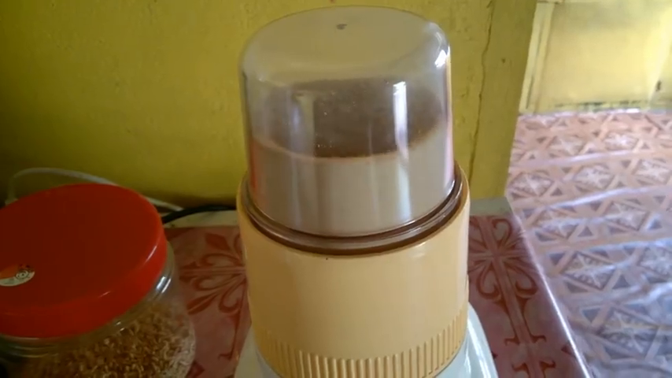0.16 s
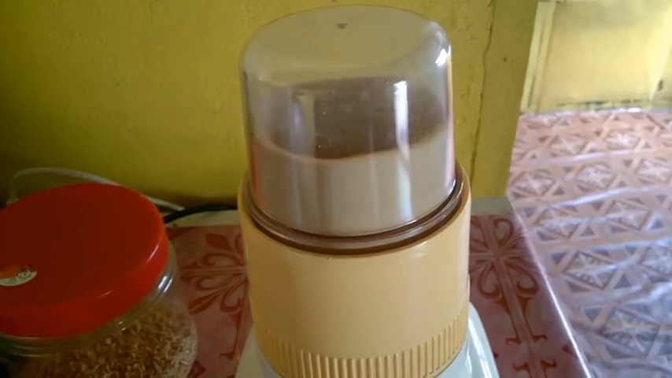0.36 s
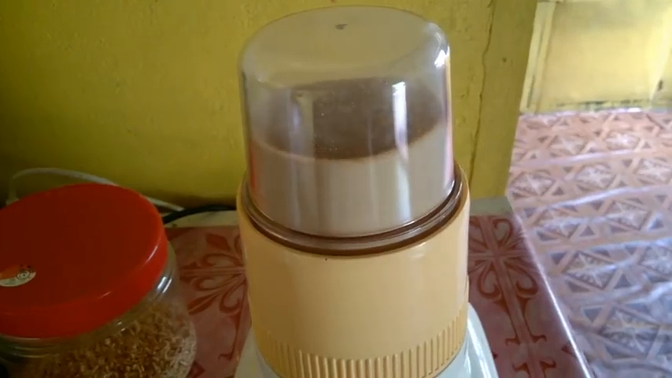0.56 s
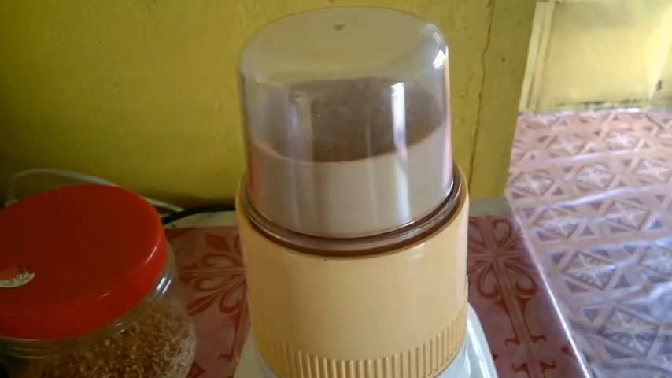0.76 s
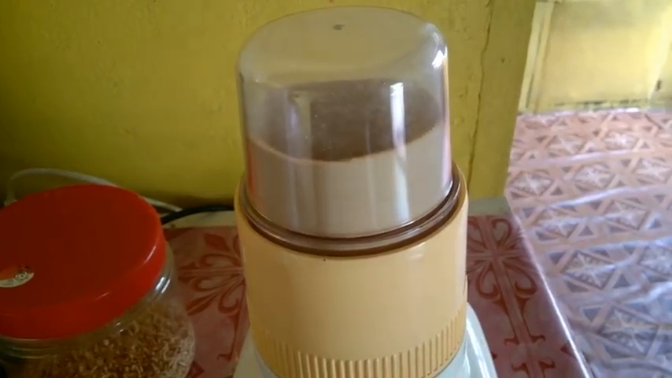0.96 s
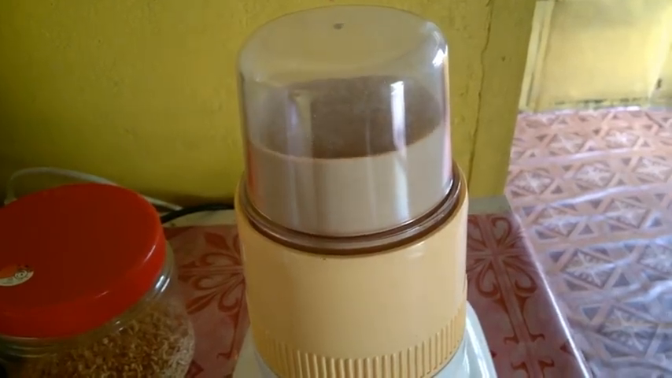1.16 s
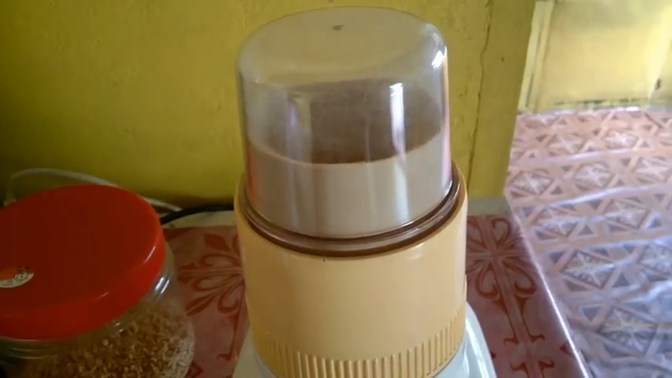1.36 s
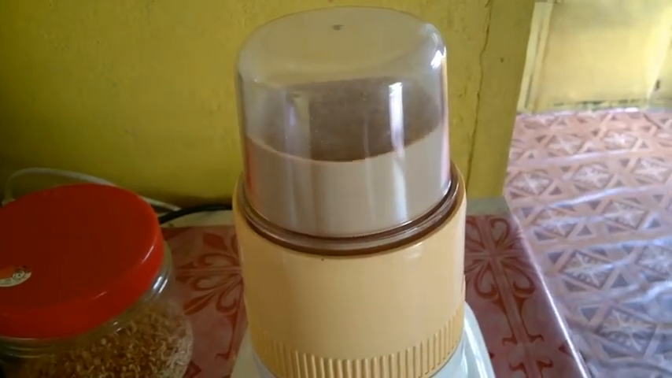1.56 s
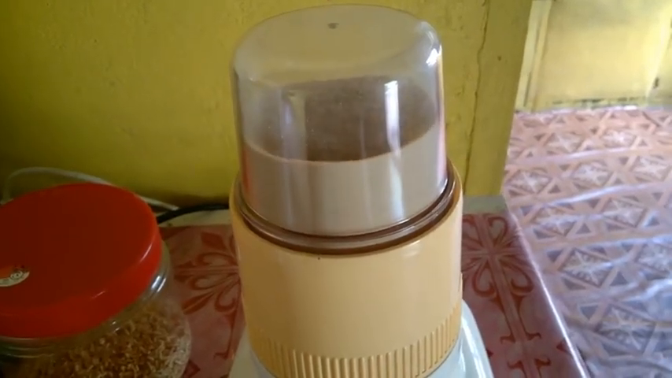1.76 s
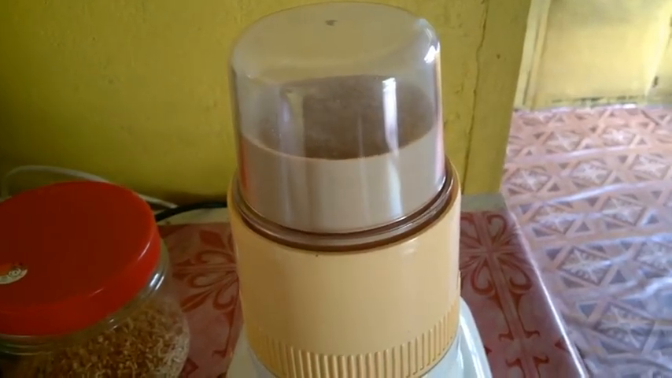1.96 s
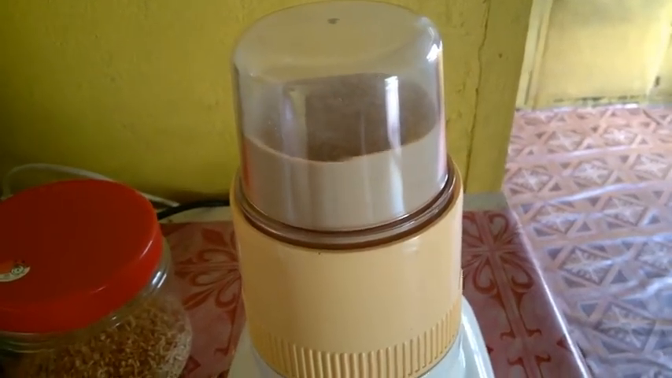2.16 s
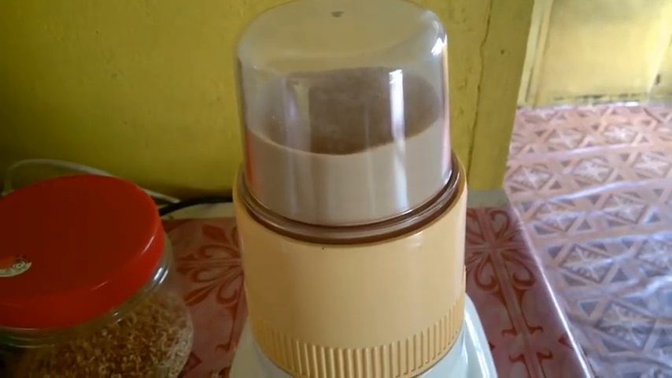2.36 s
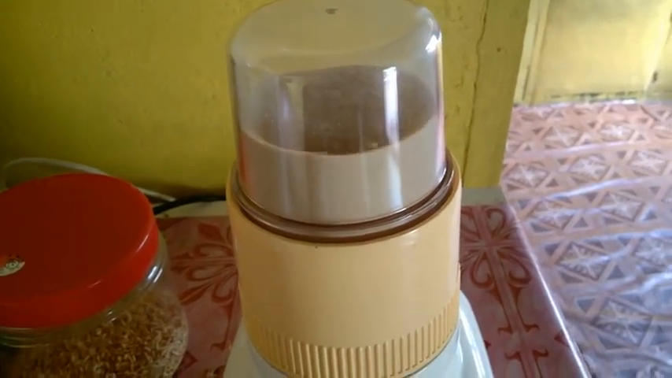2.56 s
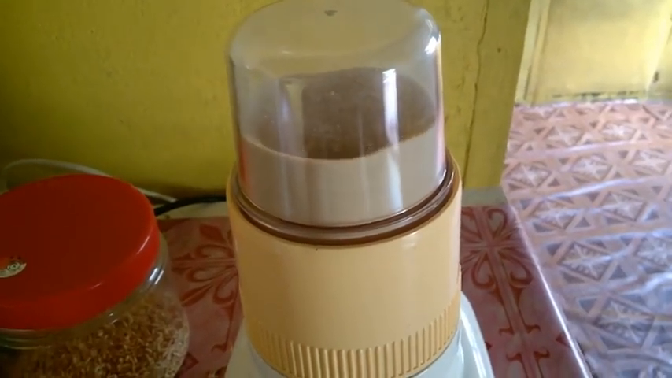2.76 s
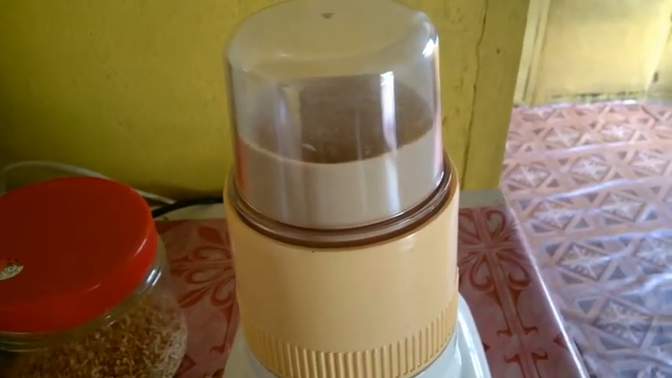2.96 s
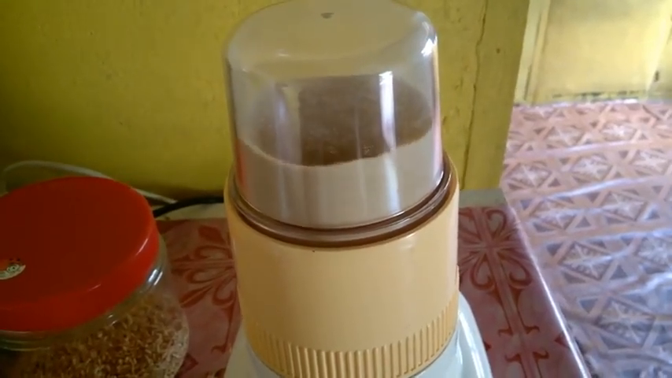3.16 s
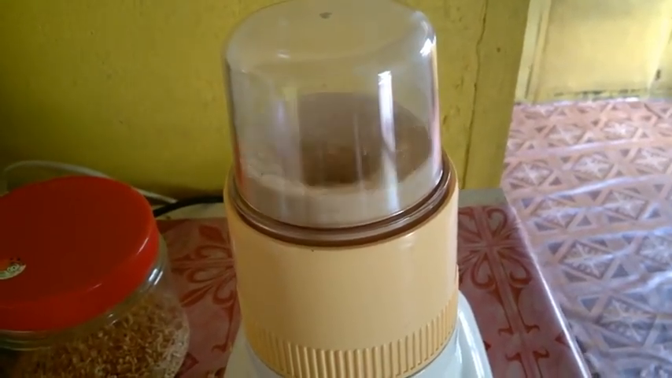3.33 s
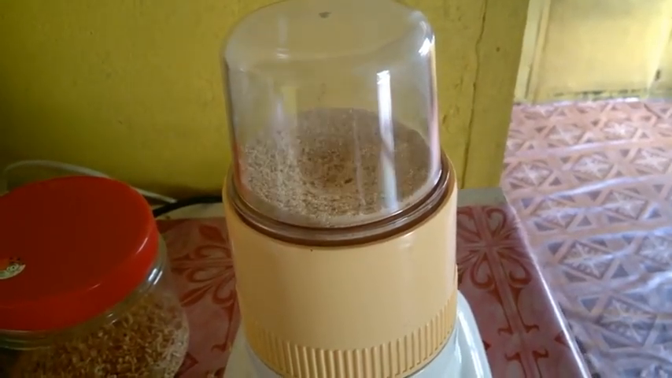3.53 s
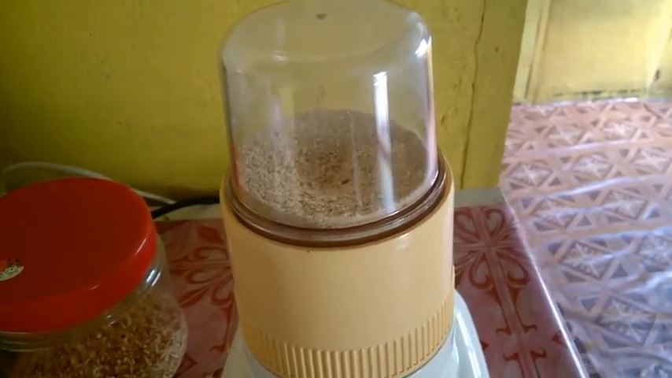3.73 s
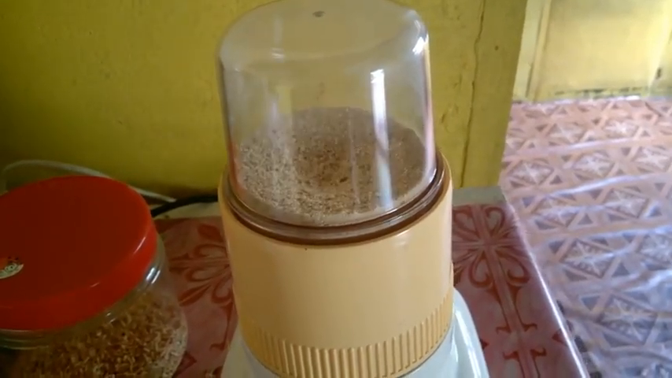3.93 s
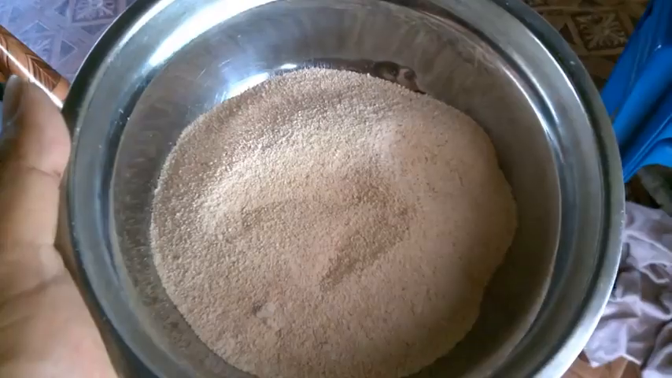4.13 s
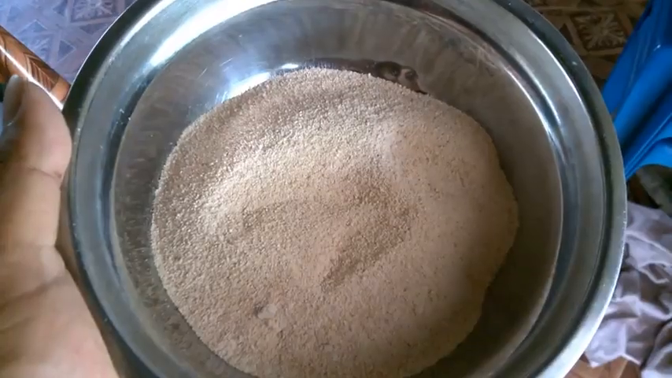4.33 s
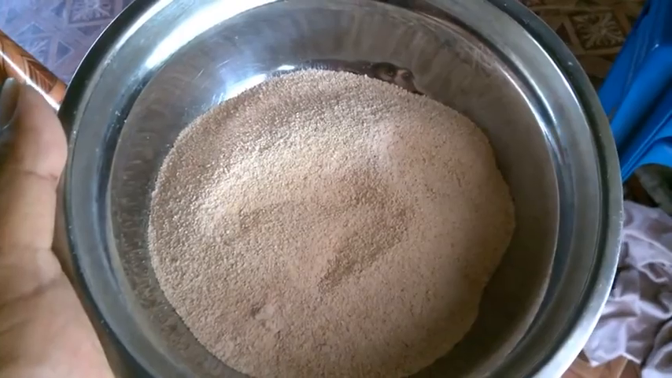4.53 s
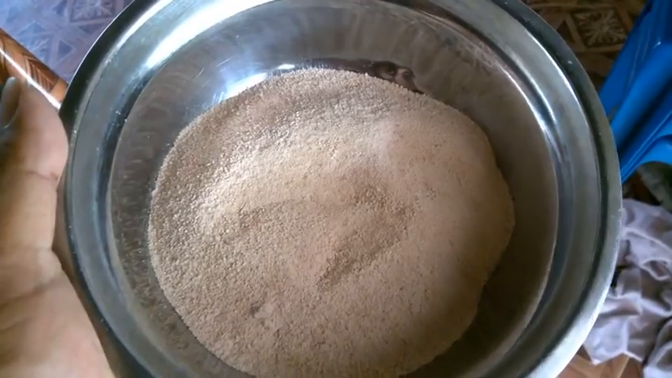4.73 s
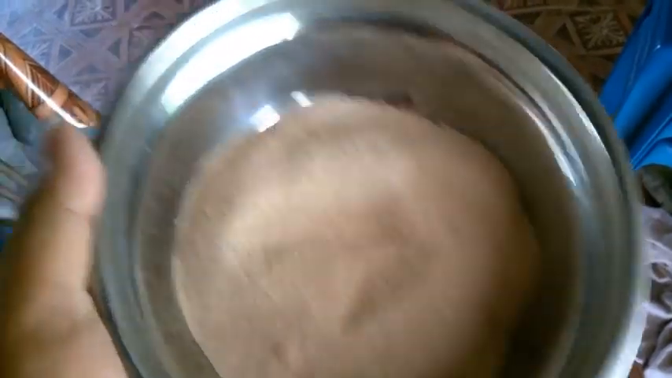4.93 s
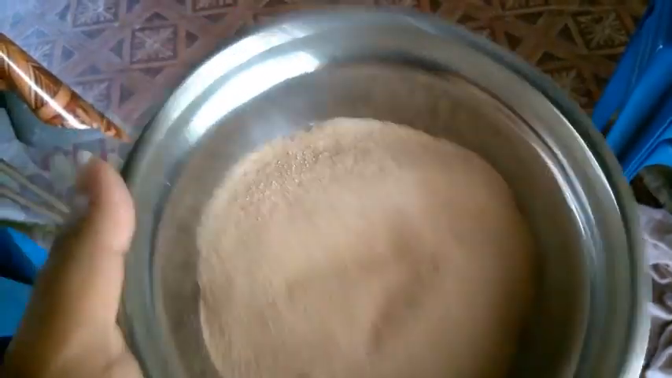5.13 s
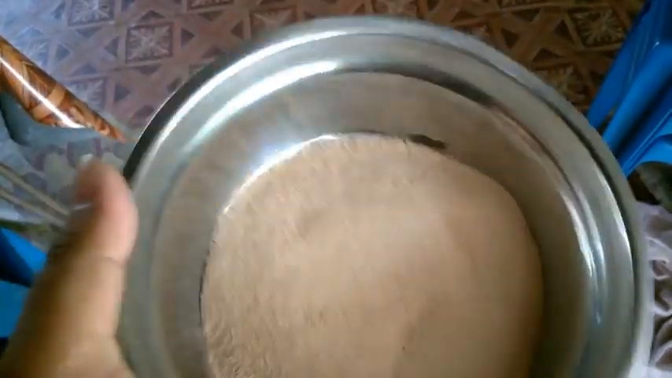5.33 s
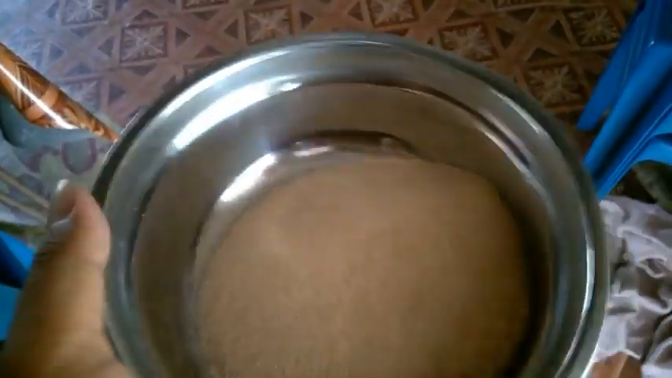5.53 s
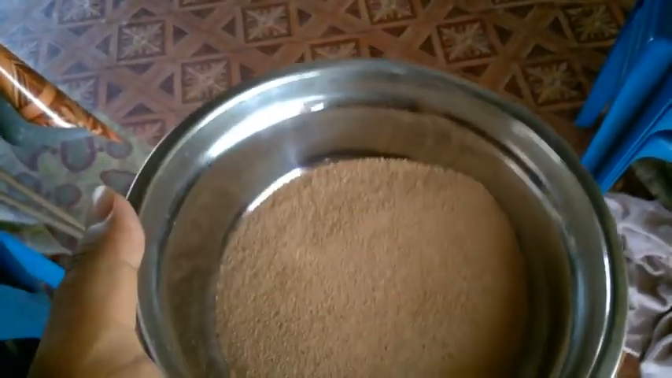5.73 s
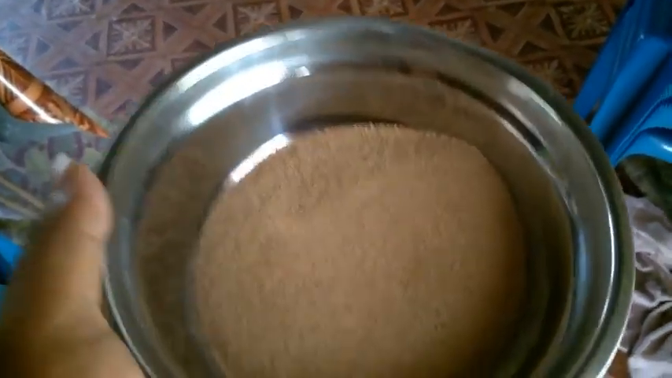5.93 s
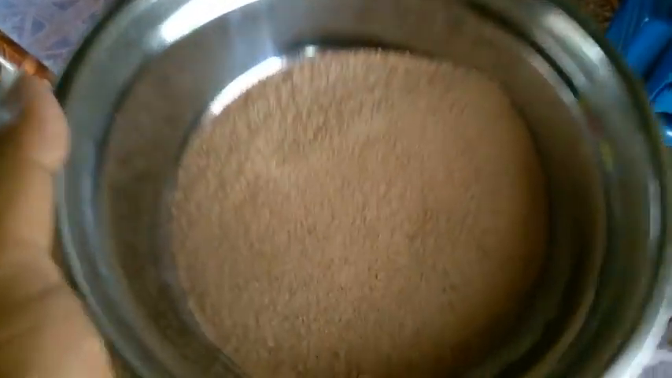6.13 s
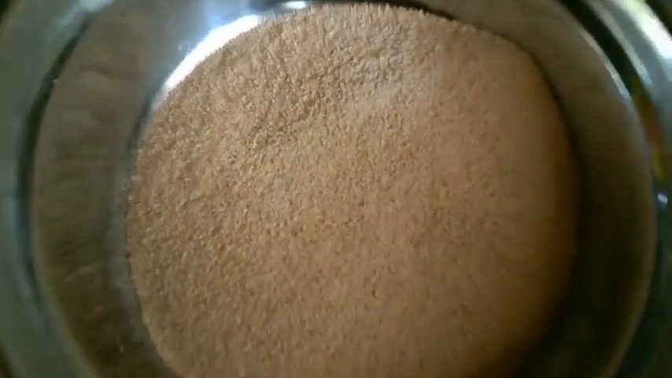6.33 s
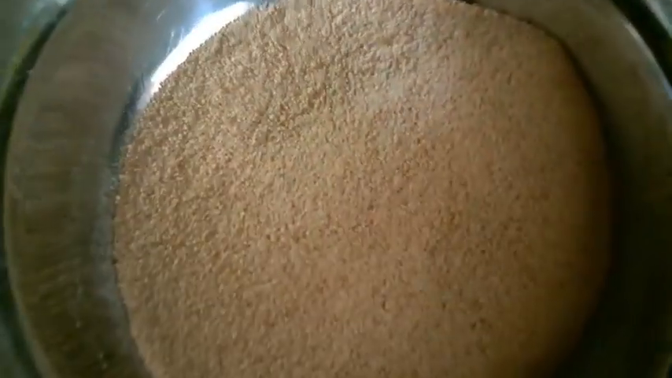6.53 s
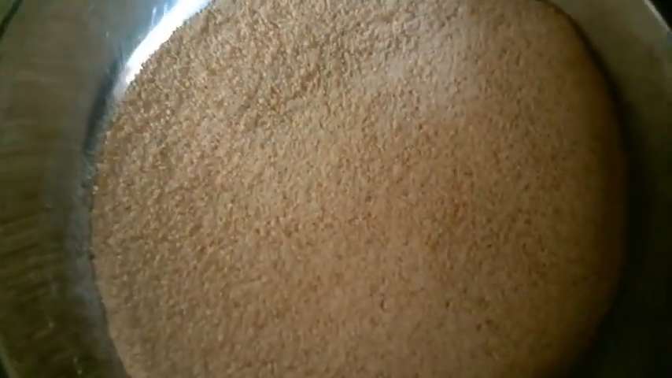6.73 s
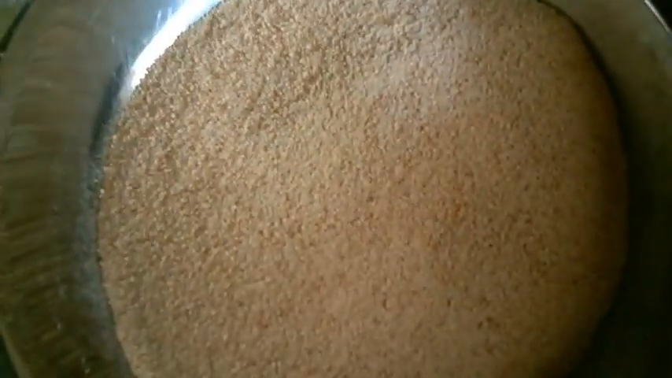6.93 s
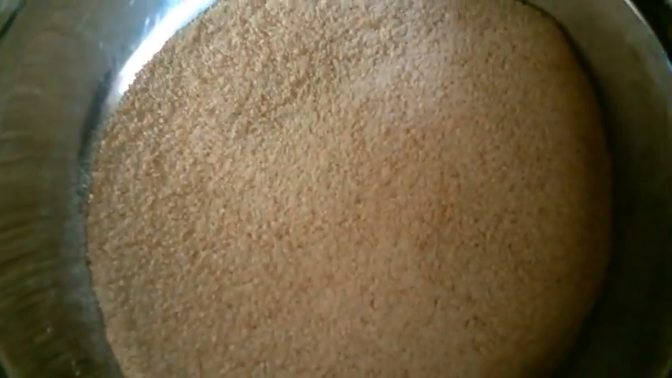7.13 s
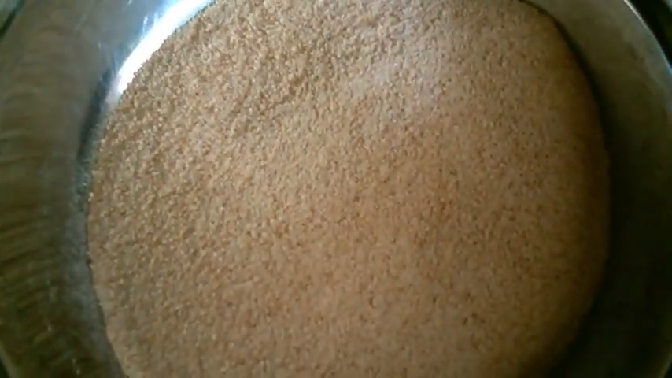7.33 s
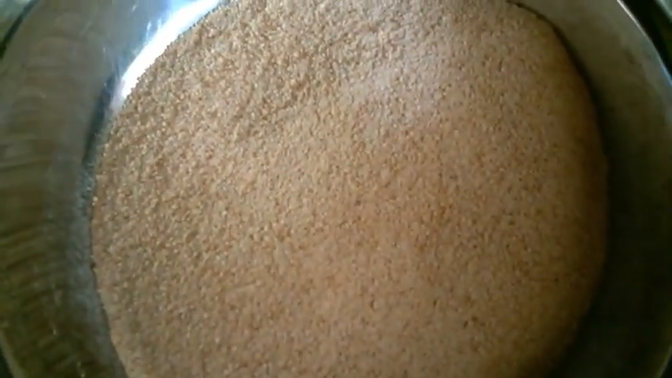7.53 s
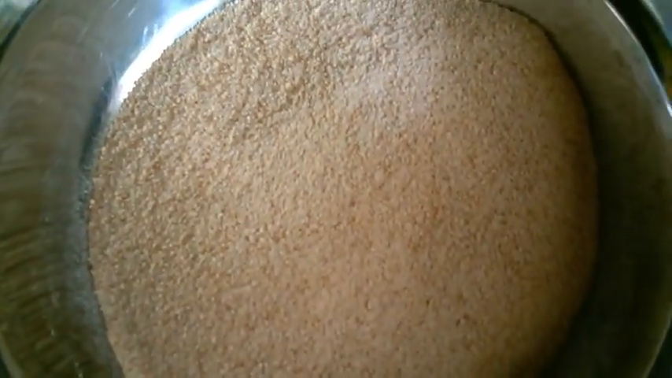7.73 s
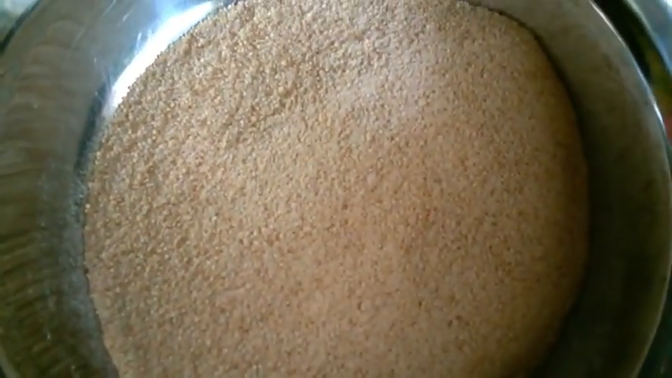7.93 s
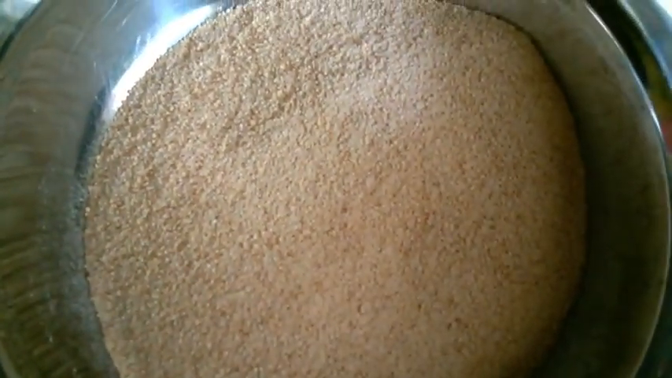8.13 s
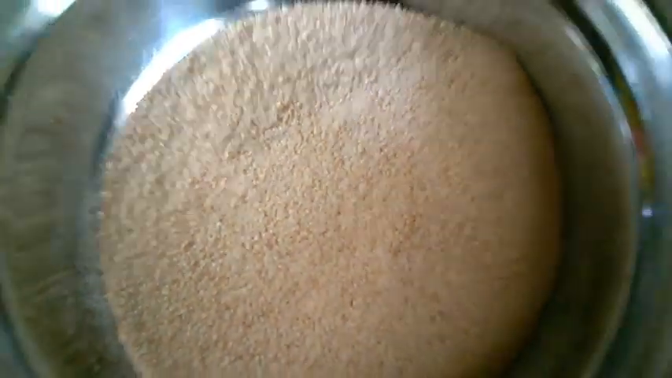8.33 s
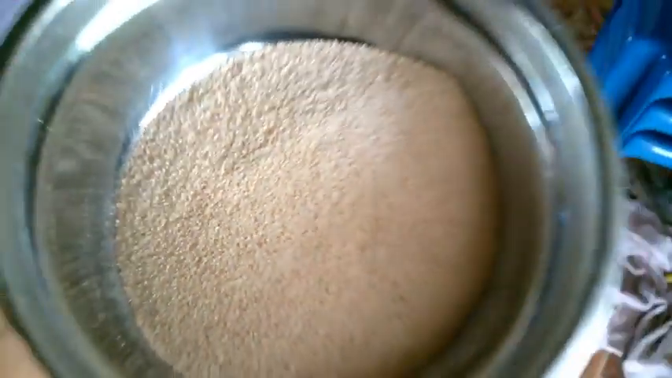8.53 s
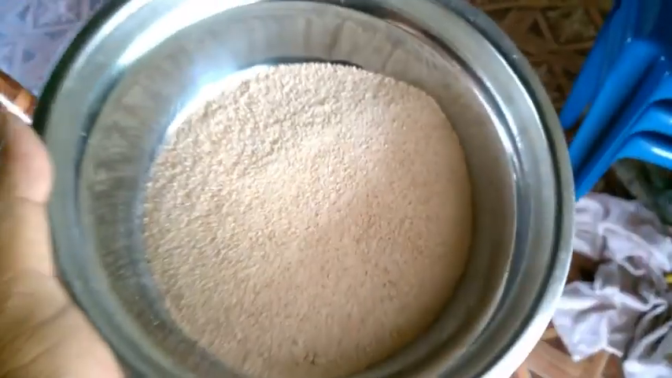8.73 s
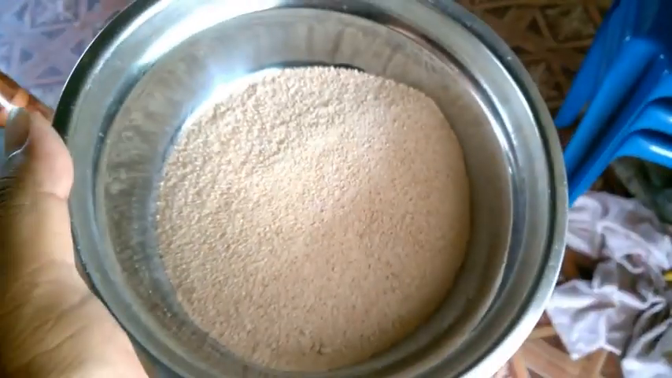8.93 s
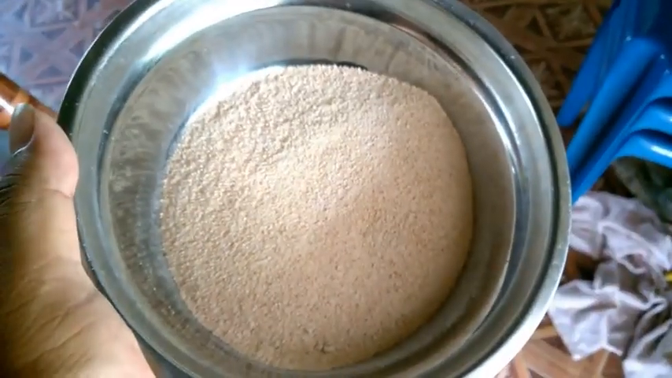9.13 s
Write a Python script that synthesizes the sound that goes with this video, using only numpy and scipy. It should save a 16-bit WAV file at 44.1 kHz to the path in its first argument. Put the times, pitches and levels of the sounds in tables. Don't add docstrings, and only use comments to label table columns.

```python
import sys
import numpy as np
from scipy import signal
from scipy.fft import rfft, irfft, next_fast_len
from scipy.io import wavfile
from scipy.ndimage import uniform_filter1d, map_coordinates

SR = 44100
rng = np.random.default_rng(int(sys.argv[2]) if len(sys.argv) > 2 else 0)


def to_wav(sig):
    pcm = np.clip(np.atleast_2d(sig), -1, 1) * 32767
    pcm = np.round(pcm).astype(np.int16)
    wavfile.write(sys.argv[1], SR, pcm.T)


def nominal_scale(level):
    x = np.asarray(level, float) / 20
    return 10 ** x


N = 404705
TIME = np.arange(N) / SR
SWITCH_OFF = 2.4
CUT, RESUME = 4.147, 4.2632

# time in seconds, turns a second.
SPEED = [
    (0, 244),
    (.9, 244.4),
    (1.8, 246.3),
    (2.38, 248.3),
    (2.46, 234),
    (2.98, 107),
    (3.12, 76.5),
    (3.22, 55.5),
    (3.35, 30),
]
# rms at full speed in dB, loss per halving of speed in dB.
SHAFT_ORDERS = [(-34, 3), (-32.5, 1.5), (-29, 10)]
# frequency in Hz, gain in dB.
STAND = [(40, -14), (85, -12), (150, -7.5), (200, -14.5), (350, 0.5), (398, -12), (475, 2), (575, -19.5),
         (800, -28.5)]
# shaft order, shift in Hz, rms in dB.
RIPPLE = [(0, 102.5, -51.5), (0, 300.5, -56.5), (1, -100, -46.5), (1, 100.5, -43), (2, 97.5, -48),
          (3, -100, -42.5), (3, 102.5, -37.5), (4, 3.5, -47.5)]
# time in seconds, force in dB.
GRAIN_FORCE = [
    (0, -16),
    (.14, -18),
    (2.0, -16.5),
    (2.41, -16.5),
    (2.84, -18.5),
    (3.15, -22),
    (3.34, -28.5),
    (3.56, -54),
    (3.62, -54),
]
# frequency in Hz, density in dB per Hz.
HOUSING = [(18, -61.5), (30, -28), (188, -15), (214, -14.5), (245, -3.5), (271, -10), (296, -8.5),
           (391, -10.5), (487, -1), (556, -17.5), (625, -10.5), (724, -16.5), (1000, -13.5), (1300, -41),
           (2200, -120)]
# frequency in Hz, width in Hz, level in dB.
CUP_MODES = [(1170, 140, 0.5), (1514, 20, 3), (2044, 51, 1.5), (3000, 120, -7.5), (3324, 29, -6),
             (1219, 19, -9.5), (2750, 15, -3.5), (3040, 30, 0.0)]
# frequency in Hz, width in Hz, level in dB.
LID_MODES = [(3919, 77, 2.0), (3930, 23, -3.0), (4724, 48, -0.5), (5364, 95, 0.5), (5760, 41, -2.5),
             (7155, 120, -7.5), (8100, 32, -17.5), (8070, 81, -12.0), (8975, 83, -16.0), (9440, 55, -20.5),
             (9970, 130, -24.5), (10780, 100, -18.0), (10800, 26, -17.5), (11080, 68, -22.5),
             (11485, 43, -21.0), (4060, 35, -8.5), (4460, 39, -7), (4840, 25, -13.0), (5190, 53, -7.5),
             (5246, 43, -6), (5310, 52, -6), (5674, 30, -9)]
# frequency in Hz, density in dB per Hz.
CUP_HISS = [(470, -30), (800, -14), (921, -17.5), (1150, 1.5), (1780, -6.5), (2030, -1), (2200, -2.5),
            (2960, 1.5), (3700, -18.5), (4810, -34.5), (8140, -120)]
# frequency in Hz, density in dB per Hz.
LID_HISS = [(2180, -28), (3700, 1), (3810, -2), (3950, 2.5), (4300, -3.5), (4560, -1), (5300, -3),
            (5940, -5.5), (6470, -12.5), (7290, -13), (7650, -10.5), (9550, -25.5), (11000, -20),
            (13900, -29), (15500, -24.5)]
# frequency in Hz, width in Hz, depth from 0 to 1.
HOLLOWS = [(557, 38, 0.3), (3634, 140, 0.9), (3990, 40, .45), (4200, 90, 0.3)]
# frequency in Hz, gain in dB.
DRUM = [(4000, -59), (4400, -47.5), (5200, -32), (5600, -8.5), (5900, -5.5), (6250, -2), (6600, -6.5),
        (6900, -14.5), (7500, -25), (8100, -33.5), (8800, -42), (10700, -46.5), (11200, -62.5)]
# time in seconds, length in seconds, change in dB.
LULLS = [
    (4.5, 0.35, -2.5),
    (6.1, .3, -2),
    (6.39, 0.037, -2.5),
    (6.8, 0.21, 0.5),
    (7.26, 0.13, -3.5),
    (7.72, .15, -1),
    (7.98, 0.043, -4),
    (8.31, 0.066, -2),
    (8.87, .09, -3.5),
]
# frequency in Hz, density in dB per Hz.
AIR_LOW = [(12, -40), (20, -7.5), (58, -1), (112, -14), (152, -10.5), (231, -27.5), (308, -21),
           (553, -31.5), (736, -32), (1100, -40.5), (1430, -70), (2420, -120)]
# frequency in Hz, density in dB per Hz.
AIR_HIGH = [(700, -29), (900, -6.5), (1300, -5), (2000, -9.5), (3000, -1.5), (4000, -4), (5200, -4),
            (6200, 12), (7500, -9), (9000, -13.5), (11000, -25.5), (15500, -33)]
# frequency in Hz, rms in dB.
KITCHEN_HUM = [(70.0, -55), (118.4, -66.5), (301.5, -64)]
# frequency in Hz, rms in dB.
PIPES = [(740, -76), (900, -77)]
# start in seconds, level in dB, centre in Hz, width in octaves, boom in dB.
KNOCKS = [(3.803, -59.5, 1800, 0.52, -80), (3.851, -55.5, 3000, 0.27, -80), (4.03, -63, 2700, 0.69, -86),
          (4.6, -61, 1490, 1.5, -80), (5.79, -62, 2500, .8, -83), (6.419, -58.5, 2600, 0.66, -80),
          (6.648, -35.5, 1086, 1.8, -32), (6.679, -35, 1830, 1.3, -34.5), (6.82, -44.5, 1100, 1.5, -35),
          (7.002, -56.5, 1800, 1.7, -50), (7.09, -51.5, 1290, 1.8, -54.5), (7.137, -48.5, 2200, 1.2, -45.5),
          (8.976, -54, 2540, 0.75, -58), (8.98, -54.5, 950, 0.42, -62.5)]
# frequency in Hz, width in Hz, level in dB.
BOOM = [(45, 30, -2.5), (95.6, 25, 2), (131, 26, 0), (250, 50, -10), (320, 42, -6), (628, 70, -12.5)]
# crank order, rms in dB.
FIRING = [(1, -66.5), (3, -63.5), (4, -60), (7, -64.5)]
# time in seconds, length in seconds, rms in dB.
SWELLS = [
    (4.7, 0.22, -45),
    (6.047, 0.18, -44),
    (6.683, .11, -39.5),
    (7.608, .13, -42),
    (8.31, 0.24, -39.5),
    (8.923, 0.12, -38),
]
# frequency in Hz, rms in dB.
WALLS = [(120, -54), (129, -50), (135, -54), (137.5, -64), (150, -51), (157, -53), (160.5, -62),
         (163, -47.5), (175, -46.5)]
# start in seconds, length in seconds, pitch in Hz, smear in Hz, level in dB.
BIRDS = [(4.522, 0.13, 2900, 600, -66), (4.613, 0.13, 4000, 110, -61.5), (4.628, 0.12, 3750, 120, -61),
         (4.87, .08, 4560, 201, -65), (5.287, 0.13, 3830, 202, -61), (5.297, 0.105, 4480, 800, -55),
         (5.464, .12, 860, 90, -60), (5.755, 0.07, 3350, 200, -63), (7.05, .08, 4800, 151, -63),
         (7.145, 0.116, 3990, 100, -59), (7.458, 0.1, 4800, 800, -58), (7.569, 0.112, 3770, 201, -58),
         (7.894, 0.066, 3200, 700, -63), (8.101, 0.068, 4370, 708, -62), (8.69, .05, 7200, 400, -54),
         (8.775, .09, 4470, 700, -61), (8.785, 0.085, 2850, 400, -62.5)]
# time in seconds, level in dB.
SHAKES = [
    (5.1, -70),
    (5.205, -66),
    (5.295, -63),
    (5.38, -65),
    (5.46, -68),
    (5.53, -67),
    (5.595, -75),
    (5.68, -71),
    (6.685, -61),
    (6.73, -64),
]
# frequency in Hz, gain in dB.
POWDER = [(5000, -27), (8000, 1), (10500, 3.5), (13000, -6), (15500, -16)]


def unit(x):
    return x / np.sqrt(np.mean(x ** 2) + 1e-20)


def curves(rows):
    seconds, *columns = np.transpose(rows)
    return [np.interp(TIME, seconds, column) for column in columns]


def bumps(rows):
    return sum(height * np.exp(-.5 * ((TIME - s) / length) ** 2) for s, length, height in rows)


def by_place(pair):
    return np.where(TIME < CUT, *pair)


def shape(points):
    f, db = np.transpose(points)
    return lambda hz: nominal_scale(np.interp(np.log(hz + 1), np.log(f + 1), db, left=-120, right=-120))


def modes(peaks):
    def response(f):
        total = 0
        for k, (hz, width, db) in enumerate(peaks):
            total = total + (-1) ** k * nominal_scale(db) * 1j * f * width / (hz * hz - f * f + 1j * f * width)
        return total
    return response


def filtered(x, response):
    size = next_fast_len(len(x) + 8192)
    return irfft(rfft(x, size) * response(np.fft.rfftfreq(size, 1 / SR)), size)[:len(x)]


def noise(response, size=N):
    return unit(filtered(rng.standard_normal(size), response))


def wobble(rate):
    s = np.arange(0, N + 64, 64) / SR
    return np.interp(TIME, s, map_coordinates(rng.standard_normal(N // 100), [s * rate]))


def patchy(x, depth_db):
    z = signal.stft(x, nperseg=512)[2]
    across_hz = uniform_filter1d(rng.standard_normal(z.shape), size=9, axis=0)
    field = unit(uniform_filter1d(across_hz, size=18, axis=1))
    return unit(signal.istft(z * nominal_scale(depth_db * field), nperseg=512)[1][:N])


def turns(hz):
    return 2 * np.pi * np.cumsum(hz) / SR


def room(x, t60):
    t = np.arange(SR // 2) / SR
    tail = rng.standard_normal(len(t)) * nominal_scale(-60 * t / t60)
    return signal.fftconvolve(x, tail / np.linalg.norm(tail))[:N]


def motor():
    hz = curves(SPEED)[0]
    shaft = turns(hz + 0.71 * wobble(20))
    critical_db = 17.5 * np.exp(-((hz - 246) / 52) ** 2)
    sag_db = 0.46 * np.maximum(SWITCH_OFF - TIME, 0)
    rough_db = np.where(TIME < SWITCH_OFF, .6, 1.6)
    orders = 0
    for order, (db, loss_db) in enumerate(SHAFT_ORDERS, 1):
        level_db = db + loss_db * np.log2(hz / hz[0]) + sag_db + critical_db * (order == 1)
        level = nominal_scale(level_db + rough_db * wobble(23)) * shape(STAND)(order * hz)
        orders = orders + level * np.sin(order * shaft)
    ripple = 0
    for order, shift_hz, db in RIPPLE:
        level = nominal_scale(db + 0.5 - TIME + 3.1 * wobble(16))
        ripple = ripple + level * np.sin(order * shaft + 2 * np.pi * shift_hz * TIME)
    running = np.clip((3.35 - TIME) / 0.16, 0, 1)
    powered = np.clip((SWITCH_OFF - TIME) / 0.099, 0, 1)
    return np.sqrt(2) * (orders * running + ripple * powered)


def struck_by_grain(body, hiss, ring, hiss_gain):
    hail = rng.standard_normal(N) * nominal_scale(2.5 * rng.standard_normal(N))
    sound = unit(ring * unit(filtered(hail, modes(body))) + hiss_gain * noise(shape(hiss)))
    return unit(sound + .35 * room(sound, t60=.2))


def hollow_response(f):
    gain = 1
    for hz, width, depth in HOLLOWS:
        gain = gain * (1 - depth * np.exp(-((f - hz) / width) ** 2))
    return gain


def grain():
    force_db = curves(GRAIN_FORCE)[0]
    thinning_db = 2.5 * np.minimum(TIME, 2.8)
    weak_db = np.minimum(force_db + 20.5, 0)
    lid_db = force_db + 1.5 + 0.35 * wobble(12)
    cup_db = force_db - 0.33 - thinning_db + 0.17 * weak_db + .6 * wobble(11)
    housing_db = force_db - 9 - thinning_db + 1.8 * wobble(13)
    fizz_db = 1.5 + .65 * weak_db + 0.79 * wobble(9)
    mains_pull = 1 + .08 * np.sin(2 * np.pi * 100 * TIME) * (TIME < SWITCH_OFF)
    surge = nominal_scale(0.31 * wobble(2.4) + 0.46 * wobble(30)) * mains_pull
    ring = np.interp(TIME, [2.7, 3.3], [.75, .4])
    cup = struck_by_grain(CUP_MODES, CUP_HISS, ring, hiss_gain=1.19)
    lid = struck_by_grain(LID_MODES, LID_HISS, ring, hiss_gain=0.77)
    fizz = filtered(lid, lambda f: 1 / (1 + (9500 / (f + 1)) ** 8))
    lid = lid - fizz + nominal_scale(fizz_db) * fizz
    whirl = nominal_scale(housing_db) * noise(shape(HOUSING)) + nominal_scale(cup_db) * cup + nominal_scale(lid_db) * lid
    return filtered(whirl, hollow_response) * surge * np.clip((3.68 - TIME) / 0.14, 0, 1)


def clicks(before_hz, after_hz, gain_hz, top_hz):
    return by_place((before_hz, np.minimum(after_hz + gain_hz * (TIME - CUT), top_hz)))


def cicada(hz, song_db, group_size, odd_db, depth, squeeze, pitch, wet):
    group = turns((hz + .12 * wobble(9)) / group_size)
    hurry = squeeze * np.sin(group + 1.3)
    train = 0
    for k in range(14, 36):
        pairing_db = odd_db * (k % 2) * np.exp(-((k - 20) / 5) ** 2)
        train = train + nominal_scale(pairing_db) * np.cos(int(k * group_size) * group + k * hurry)
    swell = np.exp(depth * (1 + 0.22 * wobble(2.2)) * np.cos(group) + 0.12 * np.cos(2 * group + 0.76))
    direct = unit(filtered(train * swell, lambda f: shape(DRUM)(f / pitch)))
    return nominal_scale(song_db) * unit(direct + wet * room(direct, t60=0.93))


def insects():
    pair_db = np.interp(TIME, [4.3, 6.2, 9.2], [-4, -6.5, -13])
    near_db = by_place((-58, -38.5)) + bumps(LULLS)
    near = cicada(clicks(305.5, 306.9, 1.48, 320), near_db, group_size=12, odd_db=pair_db,
                  depth=0.13, squeeze=.075, pitch=1, wet=1.2)
    far = cicada(clicks(330.5, 332.7, 1.02, 336.65), by_place((-49, -49.5)), group_size=12.5, odd_db=-7.5,
                 depth=.35, squeeze=0.049, pitch=1.05, wet=2.0)
    third = cicada(clicks(316.4, 316.4, 0, 320), by_place((-59.5, -85)), group_size=12, odd_db=-8.0,
                   depth=.5, squeeze=.04, pitch=0.93, wet=.9)
    return near + far + third


def hums(rows, lift_db, unsteady_db, rate):
    return sum(nominal_scale(db + lift_db + unsteady_db * wobble(rate)) * np.sin(2 * np.pi * hz * TIME) for hz, db in rows)


def air():
    calm_db = .9 * np.maximum(TIME - CUT, 0)
    low_db = by_place((-54, -46)) - calm_db + 1.4 * wobble(3.7)
    high_db = by_place((-59.5, -56.5)) - calm_db + 1.5 * wobble(2.6)
    kitchen = hums(KITCHEN_HUM, 1.0, 2.3, rate=3.1) * (TIME < CUT)
    pipes = hums(PIPES, 0.5, 2.9, rate=10) * nominal_scale(by_place((-8, 0)))
    low = nominal_scale(low_db) * noise(shape(AIR_LOW))
    high = nominal_scale(high_db) * patchy(noise(shape(AIR_HIGH)), depth_db=2.3)
    return kitchen + pipes + low + high


def knocks():
    out, t = np.zeros(N + SR), np.arange(SR // 2) / SR
    blow = unit(filtered(1.0 * (t == 0), modes(BOOM)))
    floor = np.sin(2 * np.pi * BOOM[1][0] * t)
    for s, db, hz, octaves, boom_db in KNOCKS:
        t60 = 0.7 if s < CUT else 0.53
        band = noise(lambda f: np.exp(-.5 * (np.log2((f + 1) / hz) / octaves) ** 2 - (f / 7000) ** 3), size=len(t))
        boom = noise(modes(BOOM), size=len(t)) + 0.44 * floor + 0.23 * blow
        fade = nominal_scale(-60 * t / t60) * (1 - np.exp(-t / 0.0058))
        out[round(s * SR):][:len(t)] += fade * (nominal_scale(db) * band + nominal_scale(boom_db) * boom)
    out = out[:N]
    return patchy(out, depth_db=-0.5) * np.sqrt(np.mean(out ** 2))


def engine():
    hz = 25.2 + .52 * np.maximum(TIME - 4.4, 0)
    crank = turns(hz + .15 * wobble(1.8))
    second = nominal_scale(-55) + bumps([(s, length, nominal_scale(db)) for s, length, db in SWELLS])
    strong = second * np.sin(2 * crank)
    for order in (5, 6):
        strong = strong + shape(WALLS)(order * hz) * nominal_scale(1.2 * wobble(5.5)) * np.sin(order * crank)
    weak = sum(nominal_scale(db - 1.5 + 3.2 * wobble(4.5)) * np.sin(order * crank) for order, db in FIRING)
    return np.sqrt(2) * (nominal_scale(-3.0) * strong + weak) * (TIME > CUT)


def birds():
    out, t = np.zeros(N + SR), np.arange(SR // 2) / SR
    for s, length, hz, smear_hz, db in BIRDS:
        u = t / length
        blur = noise(lambda f: np.exp(-(f / smear_hz) ** 2), size=len(t))
        note = np.sin(turns(hz * (1 - .012 * np.minimum(u, 1))))
        level = np.minimum(u / 0.14, 1) * nominal_scale(-15 * np.maximum(u - .55, 0))
        out[round(s * SR):][:len(t)] += np.sqrt(2) * nominal_scale(db) * level * blur * note
    return 0.93 * out[:N] + 0.51 * room(out, t60=0.63)


def bowl():
    slides = bumps([(s, 0.019, nominal_scale(db)) for s, db in SHAKES])
    return slides * noise(shape(POWDER))


def scene():
    mono = motor() + grain() + insects() + air() + knocks() + engine() + birds() + bowl()
    return np.array([mono, mono])


def low_pass(x):
    return signal.sosfilt(signal.butter(12, 15680, fs=SR, output="sos"), x)


def record(dry):
    since = np.maximum(TIME - RESUME, 0)
    resumed = TIME >= RESUME
    gate = (TIME < CUT) + resumed * np.clip(0.021 + (since / 0.17) ** 1.7, 0, 1)
    swing = np.cos(2 * np.pi * (1 - np.exp(-since / .09)) * 2.2)
    settle = resumed * 0.0041 * swing * np.exp(-since / 0.13)
    x = dry * gate + settle
    x = x / (1 + np.abs(x / .78) ** 6) ** (1 / 6)
    x = np.array([filtered(v, lambda f: f < 15700) for v in x])
    return low_pass(x)


dry = scene()
out = record(dry)
to_wav(out)
```